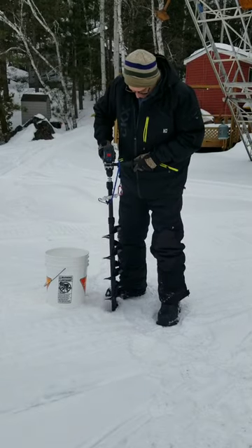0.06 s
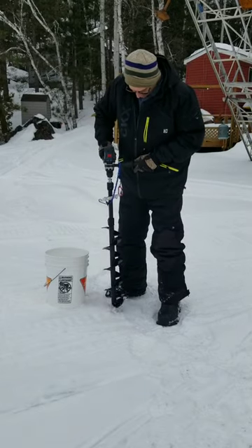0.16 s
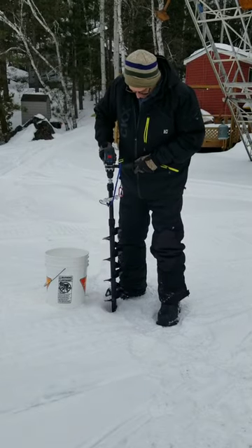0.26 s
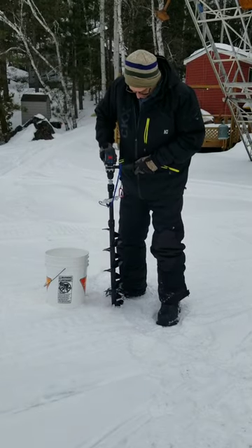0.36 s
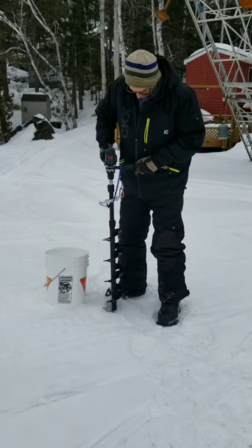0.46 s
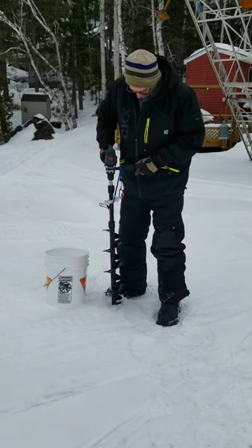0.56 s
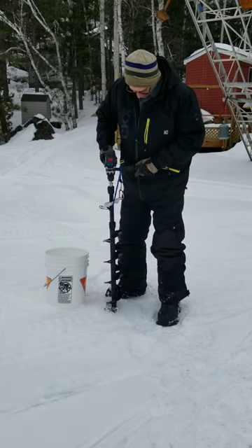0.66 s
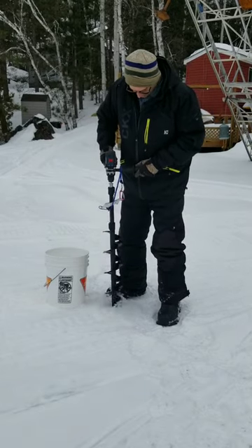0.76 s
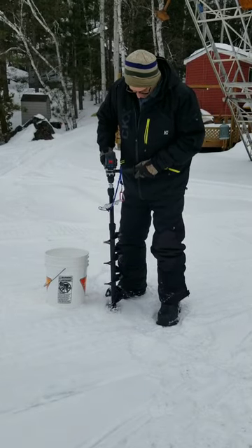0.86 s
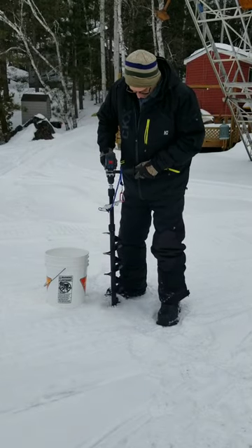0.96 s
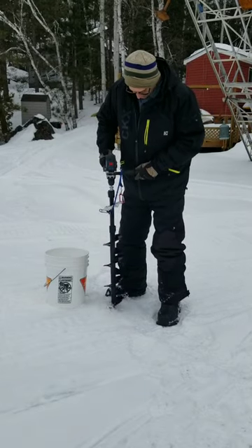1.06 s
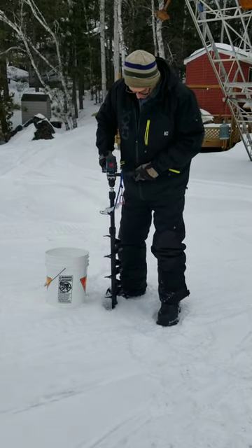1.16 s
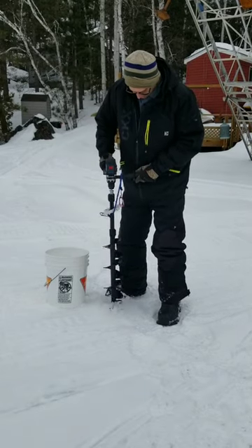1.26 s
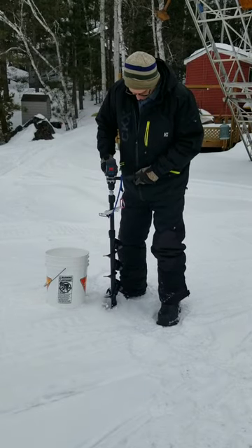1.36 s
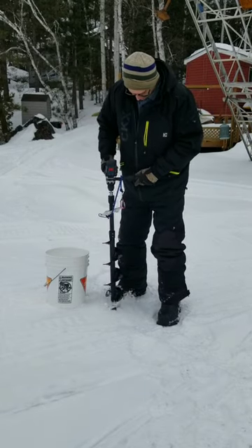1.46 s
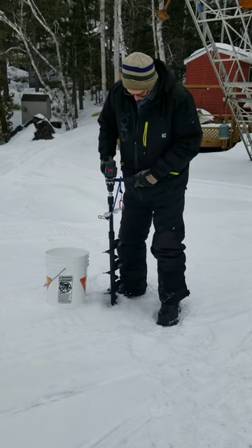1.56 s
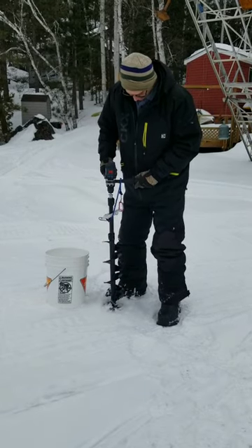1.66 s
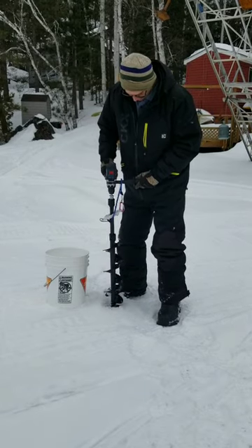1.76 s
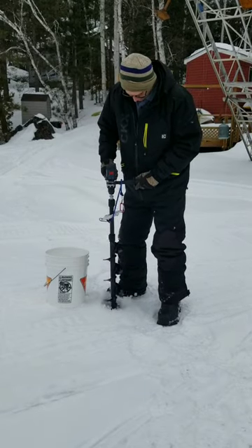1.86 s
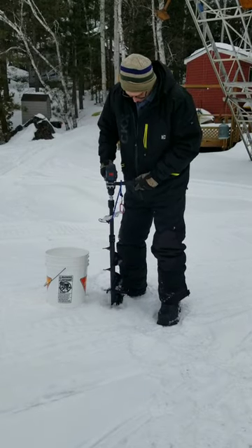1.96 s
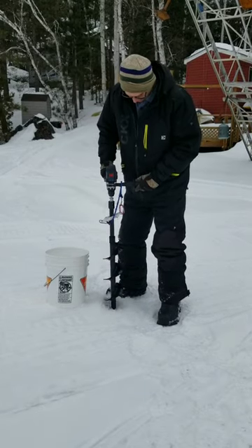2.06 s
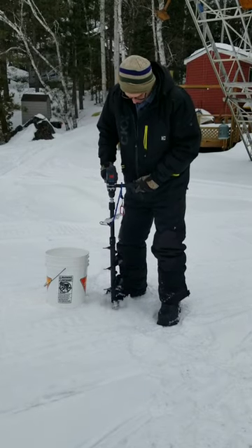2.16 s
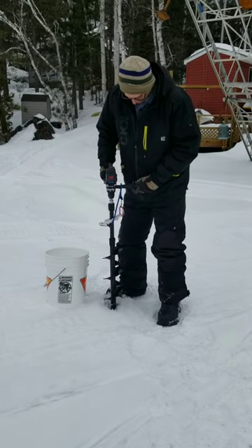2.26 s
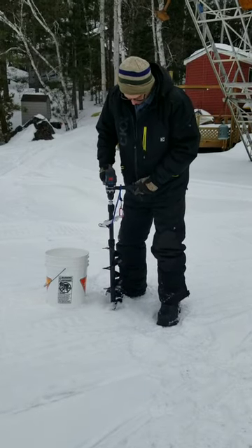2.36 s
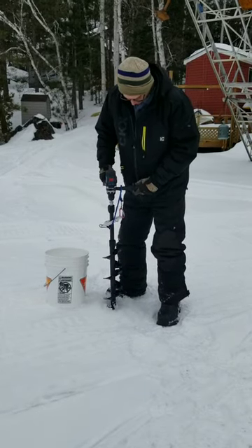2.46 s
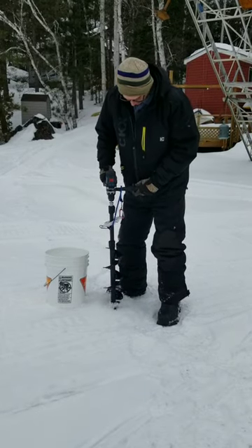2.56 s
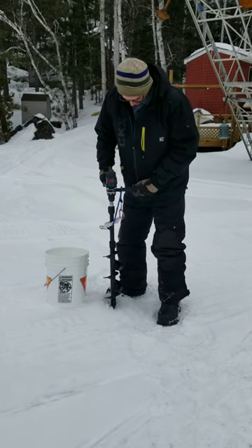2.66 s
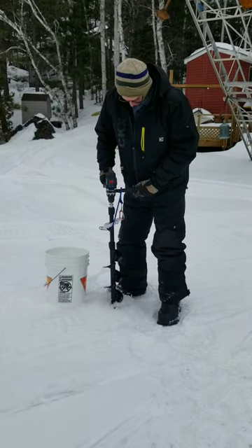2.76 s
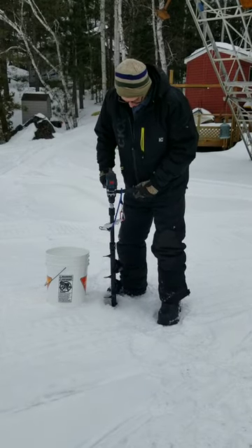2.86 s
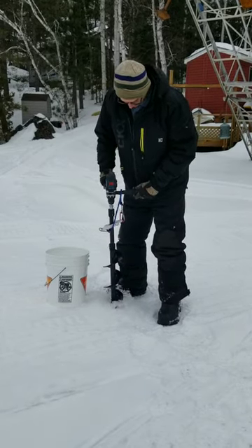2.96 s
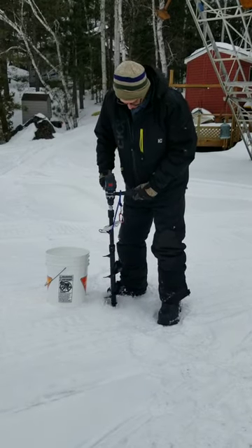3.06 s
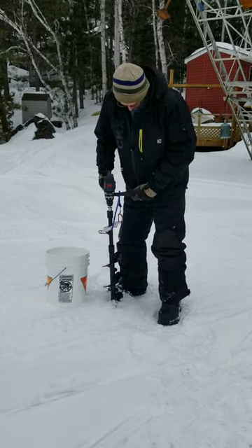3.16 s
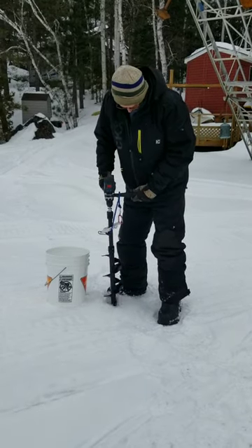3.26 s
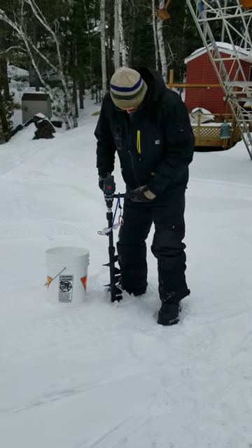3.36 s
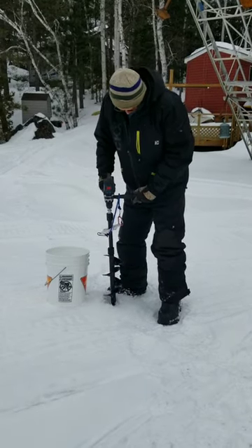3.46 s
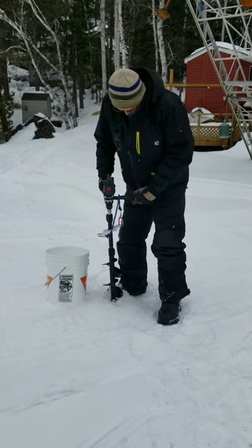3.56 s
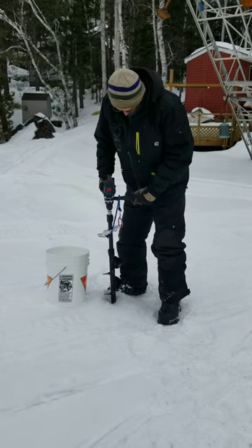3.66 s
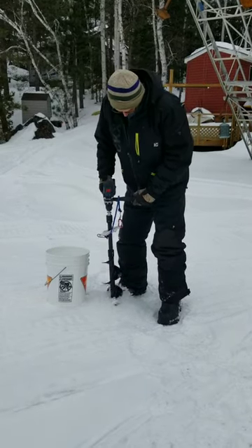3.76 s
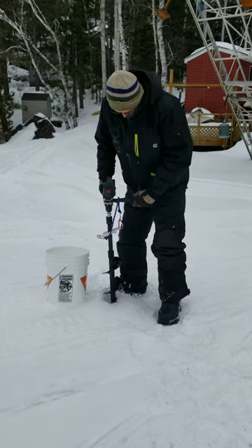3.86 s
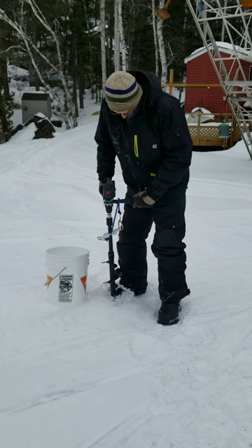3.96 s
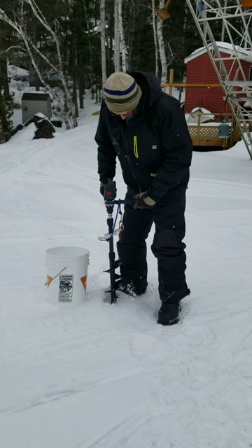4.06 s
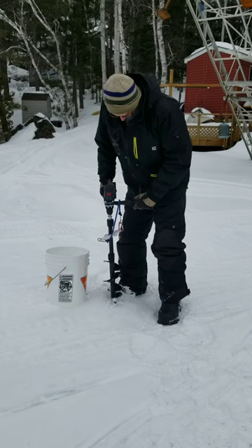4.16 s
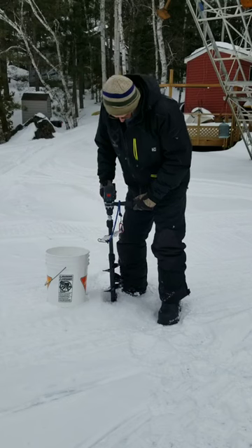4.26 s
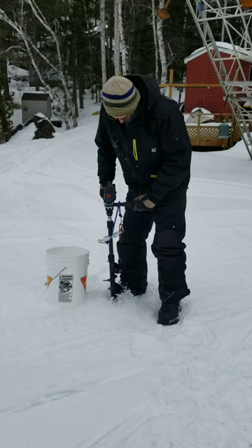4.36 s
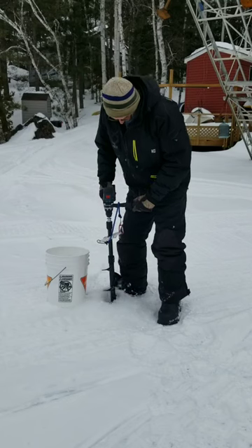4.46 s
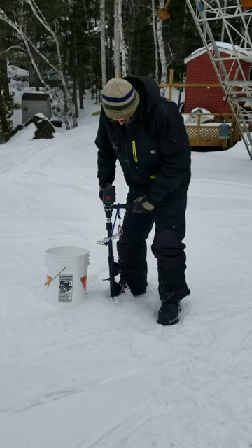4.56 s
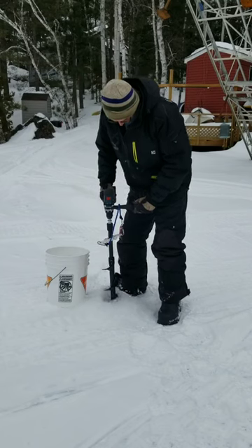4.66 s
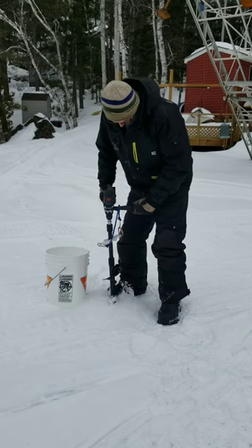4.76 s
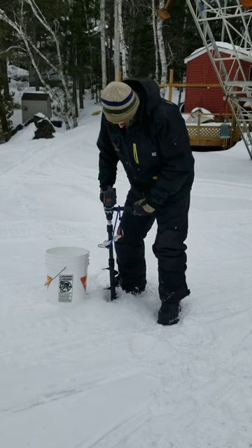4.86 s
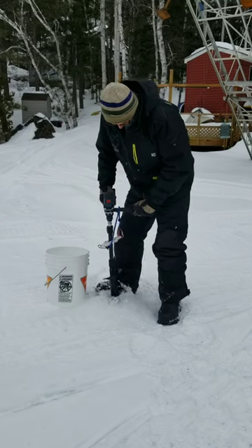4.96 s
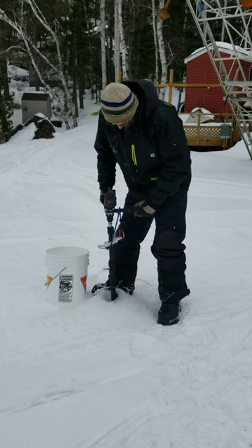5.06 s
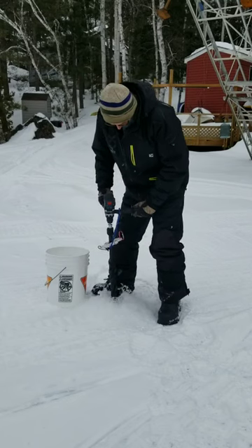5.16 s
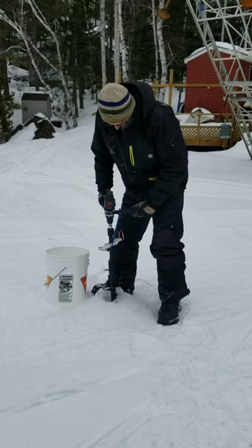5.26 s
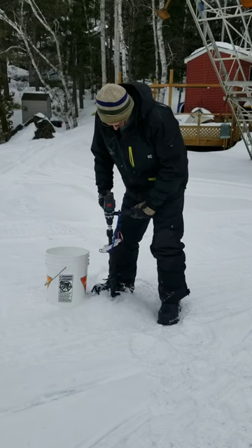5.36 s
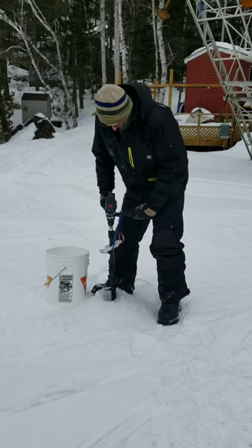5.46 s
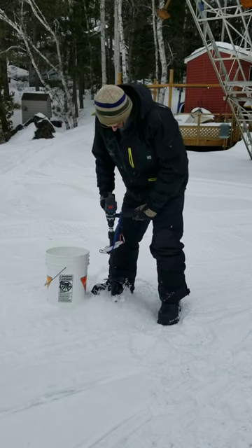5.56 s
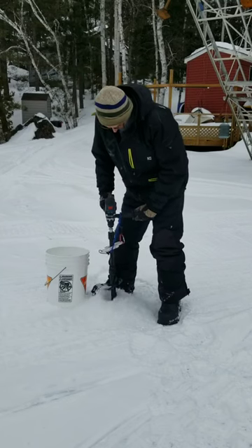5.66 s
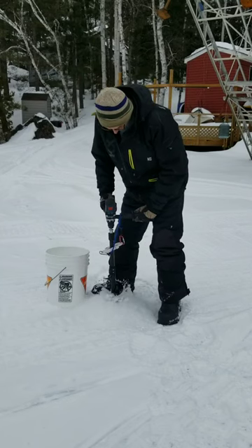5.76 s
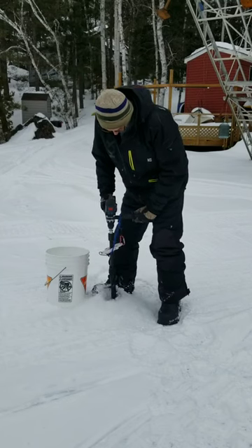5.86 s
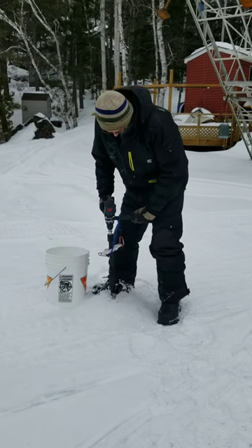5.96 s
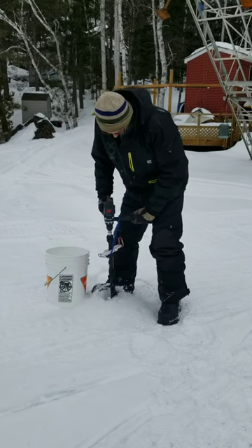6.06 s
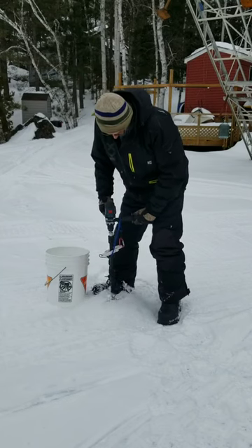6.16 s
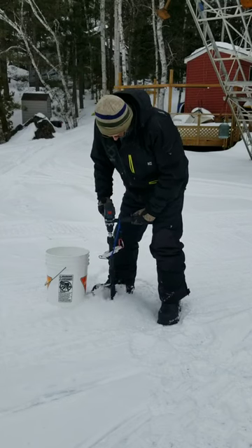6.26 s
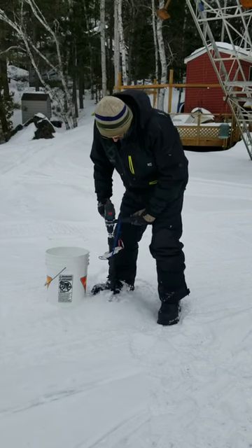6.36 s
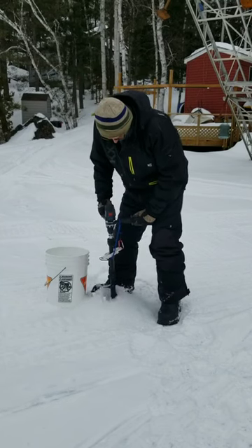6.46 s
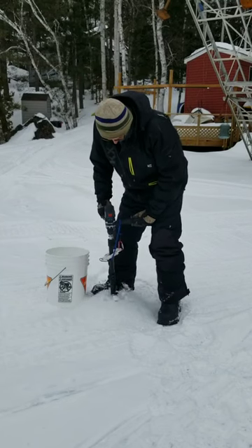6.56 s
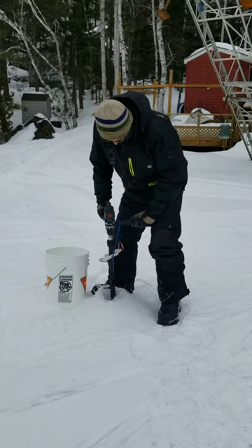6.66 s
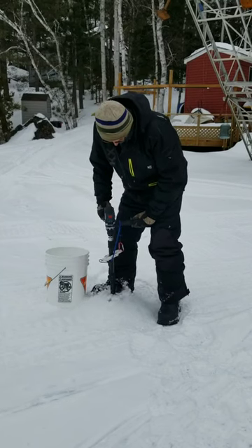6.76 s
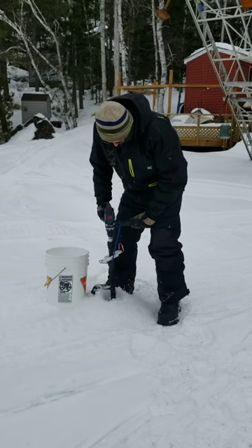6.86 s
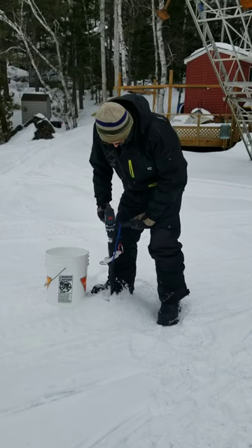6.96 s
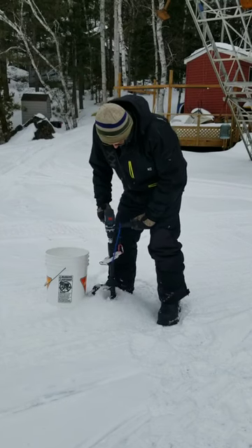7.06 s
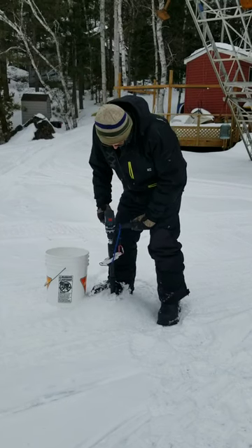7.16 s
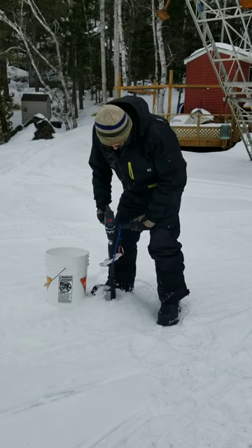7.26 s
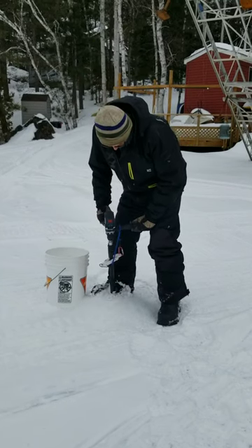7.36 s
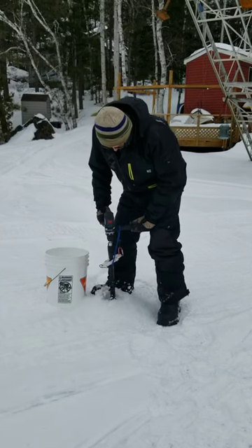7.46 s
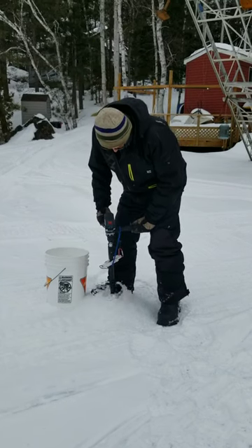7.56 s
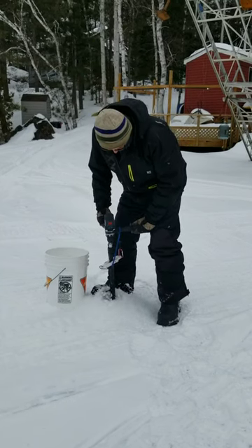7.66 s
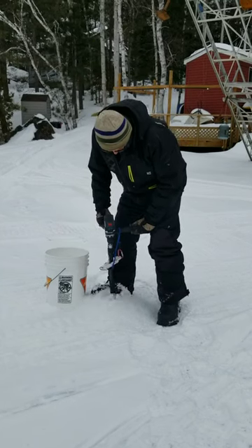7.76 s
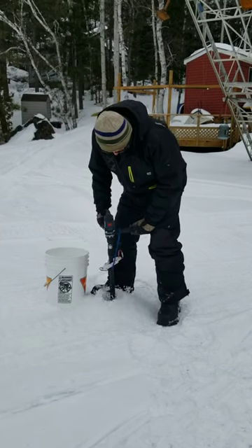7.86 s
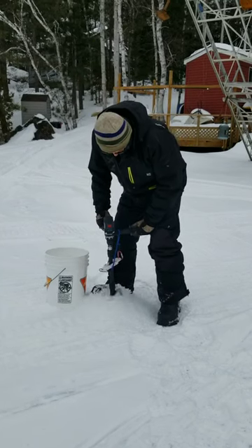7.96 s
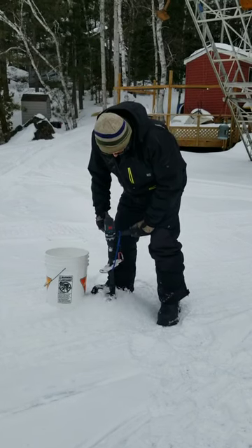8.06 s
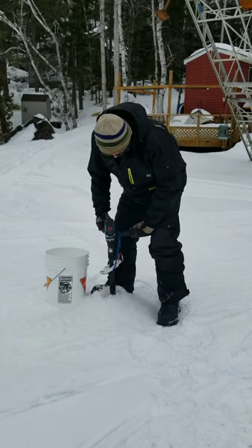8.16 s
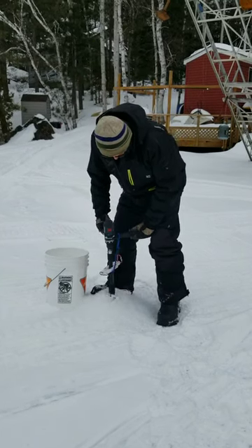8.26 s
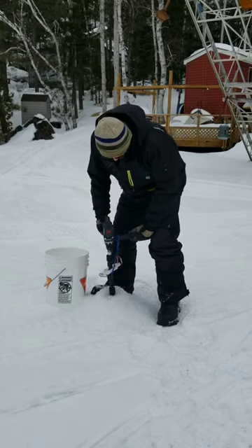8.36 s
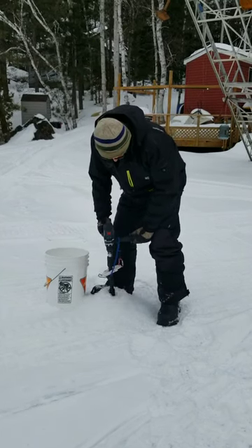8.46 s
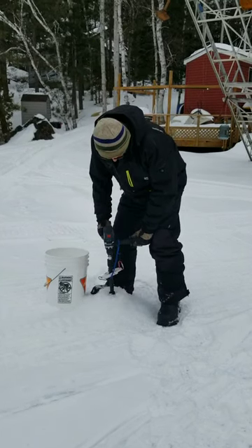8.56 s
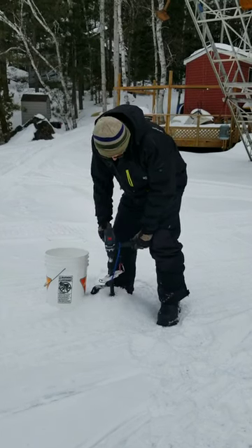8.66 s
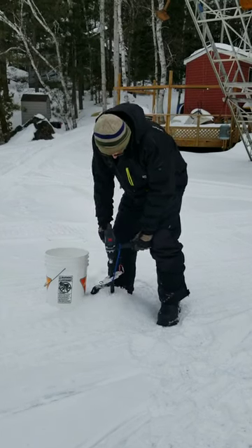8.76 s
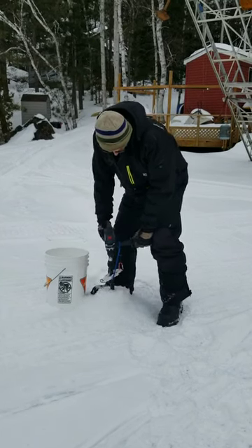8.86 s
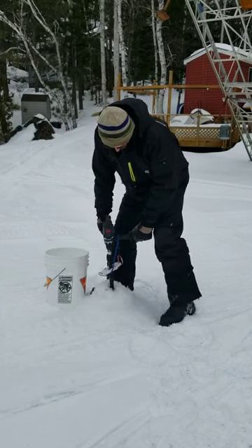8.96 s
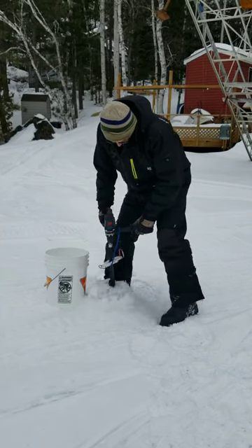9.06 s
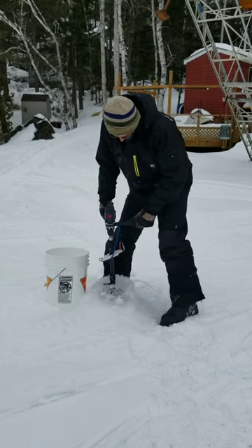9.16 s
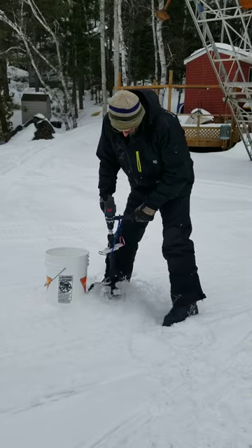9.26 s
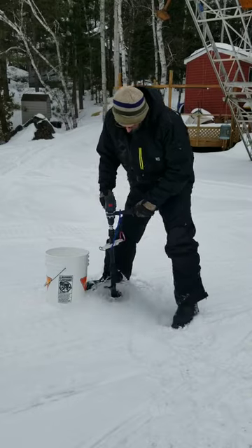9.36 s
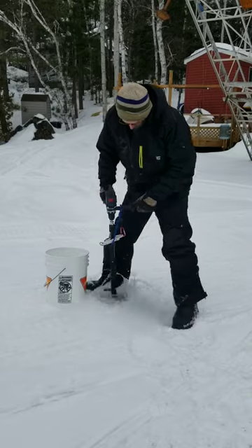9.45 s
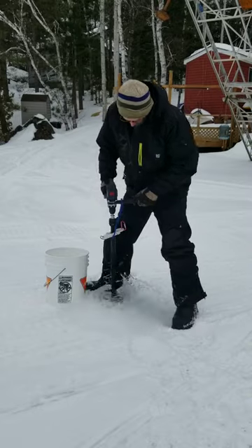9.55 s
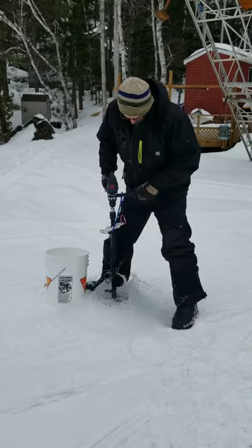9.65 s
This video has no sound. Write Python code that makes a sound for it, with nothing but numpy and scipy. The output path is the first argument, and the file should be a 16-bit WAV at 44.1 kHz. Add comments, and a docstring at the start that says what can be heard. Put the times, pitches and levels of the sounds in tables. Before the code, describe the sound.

Electric motor whine and bright icy scraping deepen into a rough, chattering grind with hard catches, then the load lets go amid low gusty wind thumps.

```python
"""On a frozen lake, a cordless drill drives an auger down through the ice, heard at two microphone ports.
The motor's whine is a set of sines locked to the rotor's turns; its speed sags, stumbles and races, and its fan
adds hiss. The blades are shaped noises: bright shaving, then grinding with a surge twice a turn, chatter, catches,
loose chips and damped knocks. A bending mode of the shaft hums at first. Gusts are low patchy noise and short pushes.
"""
import sys
import numpy as np
from scipy import signal
from scipy.fft import rfft, irfft, next_fast_len
from scipy.io import wavfile
from scipy.ndimage import uniform_filter1d, map_coordinates

SR = 44100
rng = np.random.default_rng(int(sys.argv[2]) if len(sys.argv) > 2 else 0)


def transcribe(u):
    """Save the signal u as a 16-bit wav file named by the first command-line argument.

    u: samples, shape (n,) or (channels, n), limited to [-1, 1]; the rate is SR.
    q: integer samples, one column per channel.
    """
    v = np.clip(np.atleast_2d(u).T, -1, 1)
    q = np.round(v * 32767).astype(np.int16)
    wavfile.write(sys.argv[1], SR, q)


N = 428652

BARS = 14  # commutator bars
GEAR = 53.3  # rotor turns to one turn of the auger

# All levels are relative; the mixing stages add gains of their own.
# The cut. Each row: time in seconds, level in dB of the bright shaving, level in dB of the chips on the flights.
CUTTING = [(0.0, -29.5, -43), (1.05, -32, -40), (1.25, -37, -37.5), (1.36, -44.5, -45), (1.62, -34, -38.5),
           (7.69, -39.5, -47), (8.15, -42, -40), (8.26, -44, -47), (8.55, -46.5, -46), (8.83, -45.5, -49),
           (9.15, -46, -44.5), (9.39, -54, -40.5), (9.72, -42.5, -51)]
# The blades catch hard. Each row: start in seconds, level in dB, length in seconds.
CATCHES = [(5.161, -7.5, 0.033), (5.549, -15, 0.048), (7.693, -10, 0.01)]
# The auger knocks on the wall of the hole. Each row: start in seconds, level in dB, frequency in Hz.
WALL_KNOCKS = [(1.161, -32, 427), (1.271, -28, 573), (3.037, -29.5, 516), (3.995, -28, 405),
               (4.02, -40, 550), (4.77, -26.5, 388), (5.169, -22, 494), (5.382, -32.5, 390),
               (5.561, -30.5, 430), (5.725, -28.5, 400), (5.748, -33, 523), (6.098, -32, 550),
               (6.202, -32.5, 574), (8.107, -29, 540), (9.298, -29, 324), (9.546, -33, 534),
               (9.621, -29.5, 970), (9.696, -33.5, 970)]
# Single pushes of air. Each row: start in seconds, level in dB, frequency in Hz, level in dB of the fluttering top,
# angle in degrees whose cosine weights the left port and whose sine weights the right;
# negative angles put them in opposition.
AIR_PUSHES = [(0.142, -23, 126, -48, 89), (0.589, -18, 77, -37, 50), (0.678, -28, 108, -38, 59),
              (0.737, -24, 170, -39, 60), (1.119, -24, 88, -35, 46), (1.169, -27, 89, -42, 38),
              (1.306, -22, 81, -36, 57), (1.344, -16, 62, -30.5, -58), (1.517, -25, 106, -28, 57),
              (1.65, -27, 104, -36, 88), (1.777, -26, 99, -23, 43), (1.823, -20, 164, -24.5, -17),
              (1.898, -26, 73, -25, 21), (2.002, -26, 145, -37, 5), (2.199, -13, 174, -17, 35),
              (2.25, -27, 75, -31, 34), (2.285, -28, 90, -38, 47), (2.369, -29, 75, -30, 24),
              (2.616, -28, 70, -27, 34), (2.679, -29, 75, -39, 35), (2.858, -25, 109, -33, -21),
              (3.115, -21, 107, -33, 47), (3.138, -21, 131, -37, -23), (3.354, -23.5, 100, -35, 53),
              (3.426, -21, 80.5, -31, 30), (3.779, -28, 90, -43, 37), (4.15, -36, 75, -60, 43),
              (4.694, -29, 65, -53, 37), (5.557, -29, 83, -47, 46), (5.581, -30, 85, -51, 47),
              (6.33, -29, 65, -40, 24), (7.163, -25.5, 80, -54, 30), (7.342, -21, 80, -49, -74),
              (7.404, -20.5, 80, -56, 35), (7.538, -22, 100, -52, 55), (7.759, -21, 76.5, -56, 39),
              (7.919, -14.5, 118, -50, 42), (8.046, -16.5, 70.5, -39, 16), (8.321, -33, 86, -40, 48),
              (9.128, -17, 134, -31, -41), (9.183, -20, 150, -39, -59), (9.257, -20, 160, -28, -37),
              (9.338, -17, 91, -29, 32), (9.354, -14, 111, -34, -20)]


def motor():
    """Commutation: brushes crossing the bars give tones at multiples of the rotor's turns; the fan hisses."""
    # Each row: time in seconds, levels in dB of the commutator tone, its second multiple,
    # the order just above that, and the third multiple.
    whine_levels = [(0, -44, -43, -48, -66), (.85, -54, -55, -65, -68), (1.3, -56, -70, -66, -66),
                    (1.5, -69, -72, -70, -66), (1.69, -53.5, -68, -68, -68), (2.5, -45.5, -66, -59, -60),
                    (3.3, -46.5, -65, -66, -68), (3.55, -51, -62, -56, -66), (3.9, -52.5, -46, -55, -70),
                    (4.3, -46, -52, -56, -57), (5.25, -42, -60, -53, -54), (5.5, -47, -70, -68, -55),
                    (5.65, -49, -62, -65, -57), (5.9, -52, -49, -55, -60), (6.15, -45, -60, -60, -55),
                    (6.19, -55, -60, -62, -62), (6.3, -52, -56, -58, -48), (6.38, -41, -36, -48, -51),
                    (7.35, -45, -40, -53, -49), (7.45, -49, -37.5, -48, -49), (7.97, -51, -38, -52, -51),
                    (8.22, -51, -41, -50, -58), (8.32, -54, -68, -70, -66), (8.4, -70, -50, -70, -54),
                    (8.9, -65, -50, -66, -45), (9.72, -66, -68, -68, -65)]
    # Rotor orders around the second multiple. Each row: order, level in dB, phase blur in cycles.
    second_orders = [(28.2, -7, 0.23), (24.8, -22, 0.074), (25, -14, 0.078)]
    # Rotor orders around the third multiple. Each row: order, level in dB, phase blur in cycles.
    third_orders = [(42, 0, .2), (43, -1.5, .2), (44, -7, .2)]
    tone_db, second_db, above_db, third_db = curves(whine_levels)
    turns = rotor()

    def tone(order, blur, rate=220):
        """Phase modulation: random blur broadens the line of one rotor order."""
        level = np.sqrt(2) * amp(1.3 * wobble(25))
        return level * np.sin(2 * np.pi * (order * turns + blur * wobble(rate)))

    whine = amp(tone_db) * tone(BARS, 0.14, rate=70)
    whine += amp(above_db) * tone(2 * BARS + 1, 0.31)
    whine += amp(second_db) * sum(amp(db) * tone(order, blur) for order, db, blur in second_orders)
    whine += amp(third_db) * sum(amp(db) * tone(order, blur) for order, db, blur in third_orders)
    return fan_hiss() + whine * [[1], [0]]  # the whine goes into the signal that reaches both ports


def fan_hiss():
    """Broadband flow noise: cooling air and brushes hiss with a slightly wavering level."""
    # Each row: time in seconds, level in dB.
    hiss_levels = [(0.0, -34), (1.38, -39), (1.65, -36.5), (2.03, -41.5), (5.06, -35), (5.98, -39.5),
                   (8.23, -37), (8.93, -36.5), (9.18, -38), (9.72, -39)]
    # Each row: frequency in Hz, relative spectral density in dB per Hz.
    hiss_spectrum = [(530, -51), (900, -15), (1290, 0), (3290, -8), (3580, -6.5), (3990, -3.5), (5520, -6),
                     (7550, -3.5), (8510, -12), (11900, -6.5), (13000, -9), (15000, -0.5), (15900, -1.5)]
    level = amp(curves(hiss_levels)[0] + 0.6 * wobble(10))
    return level * rush(hiss_spectrum, patchy_db=3.0, grain_db=1.1, blotch_db=2)


def rotor():
    """Phase is the integral of frequency: turns of the rotor so far, with a ripple that follows the surge."""
    ripple_hz_per_db, ripple_lead, waver_hz = 1.5, .1, 8  # the lead is in cycles of the surge
    pitch = speed() + ripple_hz_per_db * surge(ripple_lead) + waver_hz * wobble(14)
    return np.cumsum(pitch) / SR / BARS


def speed():
    """Speed falls under torque: pitch of the commutator tone in Hz, with brief stumbles where the blades hang."""
    # Base pitch of the commutator tone. Each row: time in seconds, frequency in Hz.
    base_pitch = [(0, 3680), (.15, 3680), (.35, 3760), (1.12, 3760), (1.37, 4500), (1.49, 4626),
                  (1.7, 4339), (2.04, 4270), (2.29, 4156), (2.5, 4112), (3.3, 4148), (3.9, 4225),
                  (4.55, 4185), (5.08, 4015), (5.2, 3894), (5.38, 4075), (5.655, 4235), (5.7, 4345),
                  (5.92, 4233), (6.14, 4102), (6.4, 3871), (7.15, 3847), (7.34, 3950), (7.4, 3870),
                  (7.65, 3830), (7.83, 3860), (7.91, 3940), (8.08, 3753), (8.22, 3839), (8.33, 4480),
                  (8.4, 4850), (8.55, 5090), (8.75, 5000), (9.72, 5000)]
    # Each row: centre in seconds, drop of the commutator tone in Hz, half width in seconds at 1/e of the drop.
    stumble_rows = [(2.02, 67, 0.068), (2.455, 59, 0.06), (2.693, 80, 0.08), (2.869, 90, 0.048),
                    (3.08, 136, 0.046), (3.181, 89, 0.021), (3.643, 83, 0.031), (4.293, 118, 0.045),
                    (4.43, 86, 0.058), (4.626, 80, 0.036), (5.48, 94, 0.039), (5.572, 270, 0.022),
                    (5.641, 290, 0.028), (5.76, 129, 0.08), (6.79, 51, 0.03), (6.882, 50, 0.018),
                    (6.995, 47, 0.026), (8.04, 92, 0.027)]
    t = np.arange(N) / SR
    drop = sum(hz * np.exp(-((t - s) / width) ** 2) for s, hz, width in stumble_rows)
    return curves(base_pitch)[0] - drop


def surge(lead):
    """Periodic loading: the load in dB swings twice a turn with the two blades."""
    # Each row: time in seconds, size of the swing in dB.
    surge_sizes = [(0, 1.5), (2, 1), (4, 1.8), (6.6, 1.2), (7.4, 3), (8.15, 3), (8.3, 0)]
    blade_angle = -.43  # in cycles of the surge
    auger_turns = np.cumsum(speed()) / SR / BARS / GEAR
    return curves(surge_sizes)[0] * np.cos(2 * np.pi * (2 * auger_turns + blade_angle + lead))


def blades():
    """Fracture noise: ice breaks under the edges, and the surging load also shakes shavings and chips."""
    return grinding() + shaving() + loose_chips() + wall_knocks()


def catches():
    """Stick and release: amplitude of the swells where the blades catch hard."""
    return swells([(s, amp(db - 15.5), length) for s, db, length in CATCHES])


def grinding():
    """Forced vibration: the loaded blades give a broad rasp and make the shaft ring, with chatter and catches."""
    # The blades grinding in the hole. Each row: time in seconds, level in dB.
    load_levels = [(0, -48.5), (1.15, -36.5), (1.4, -44.5), (1.75, -43.5), (2.4, -38.5), (3.2, -34.5),
                   (4.2, -35), (4.9, -31.5), (5.3, -30), (5.67, -37), (6.2, -36), (6.7, -32.5),
                   (7.4, -32.5), (8.12, -31), (8.235, -39.5), (8.27, -41), (8.5, -50), (9.1, -50.5),
                   (9.3, -41.5), (9.72, -44)]
    # The shaft chatters as an edge skips over the ice. Each row: start in seconds, level in dB.
    chatter_rows = [(.235, -34), (.418, -36), (.63, -41), (.815, -34), (.985, -45), (2.04, -39),
                    (2.43, -41), (3.195, -38), (3.585, -37), (3.8, -32), (4.0, -35), (4.165, -37),
                    (4.355, -44), (4.52, -34), (4.7, -38), (4.895, -35), (5.03, -41), (5.268, -37),
                    (5.405, -36), (5.73, -31), (5.8, -35), (5.94, -36), (6.135, -38), (6.335, -30),
                    (6.49, -37), (6.55, -39), (6.685, -33), (6.91, -37), (7.28, -45), (7.475, -40),
                    (7.525, -39), (7.86, -35), (7.975, -45), (8.085, -46), (8.175, -40)]
    # The ring keeps a steady level under the load. Each row: time in seconds, level in dB over the load.
    ring_levels = [(2, -6.5), (4.5, -6.5)]
    # The broad rasp. Each row: frequency in Hz, relative spectral density in dB per Hz.
    rasp_spectrum = [(500, -25), (850, -17), (989, -5), (1100, -14), (1330, -9), (1480, -4.5), (1580, -10),
                     (1770, -3.5), (2050, -4), (2270, -4), (2500, -7), (3600, -16.5), (4680, -58),
                     (7920, -120)]
    # The shaft ringing under load. Each row: frequency in Hz, relative spectral density in dB per Hz.
    ring_spectrum = [(1200, -120), (1560, -14), (1700, -1), (1795, 2), (1890, -2), (2100, -27),
                     (2800, -120)]
    surge_db, catch = surge(lead=0), catches()
    load_db = curves(load_levels)[0]
    chatter = swells([(s, amp(db), 0.042) for s, db in chatter_rows])
    # the rasp follows only a share of the surge and the chatter
    rasp = amp(load_db - 2.5 + 0.35 * surge_db + 0.15 * wobble(16)) + 0.65 * catch + 0.2 * chatter
    ring = amp(load_db + curves(ring_levels)[0] + surge_db + 2.5 * wobble(20)) + 0.83 * catch + chatter
    rasp_noise = rush(rasp_spectrum, patchy_db=2.2, grain_db=1.65)
    ring_noise = rush(ring_spectrum, patchy_db=0.5, grain_db=-0.5)
    return rasp * rasp_noise + ring * ring_noise


def shaving():
    """Brittle fracture: the many small breaks under the edges are heard as bright noise."""
    # Each row: frequency in Hz, relative spectral density in dB per Hz.
    shave_spectrum = [(760, -26), (1150, -36), (1300, -9), (1480, -6), (1750, -1.5), (2150, -0.5),
                      (2480, -1), (2800, 2.5), (3050, 0), (3300, -5), (3570, -3), (3850, -8.5),
                      (4080, -9.5), (5500, -11.5), (5850, -8.5), (6060, -4), (6810, -13), (7610, -6),
                      (8250, -13), (10000, -20), (13000, -16.5), (22000, -120)]
    shave_db, _ = curves(CUTTING)
    level = amp(shave_db + 0.043 * surge(lead=0) + .4 * wobble(18)) + 0.15 * catches()
    return level * rush(shave_spectrum, patchy_db=2.9, grain_db=1.8, blotch_db=1.2)


def loose_chips():
    """Granular noise: chips on the flights give low noise, and each knock shakes more loose."""
    # Each row: frequency in Hz, relative spectral density in dB per Hz.
    chip_spectrum = [(60, -58), (190, -8.5), (270, -6.5), (361, 1.5), (451, -5.5), (590, 3), (740, -1.5),
                     (986, -9.5), (1200, -18.5), (1560, -56), (2640, -120)]
    _, chips_db = curves(CUTTING)
    jolt = swells([(s, amp(db - 10.5), .03) for s, db, _ in WALL_KNOCKS])
    level = amp(chips_db + 0.33 * surge(lead=0) + 0.31 * wobble(8)) + jolt
    return level * rush(chip_spectrum, patchy_db=2.5, grain_db=1.24)


def wall_knocks():
    """Impact response: each knock on the wall of the hole is a damped sine."""
    shares = [np.array([[.8], [.2]])] * len(WALL_KNOCKS)
    return thuds(WALL_KNOCKS, shares, life=2.84, scatter=0.29)


def shaft():
    """Resonance: the unbalanced rotor keeps one bending mode humming, roughened by the cut, until the hole grips."""
    # The free shaft's hum. Each row: time in seconds, level in dB.
    hum_levels = [(0.0, -45.5), (1.35, -40), (1.45, -82)]
    mode_hz, width_hz = 363, 30

    def mode(f):
        """Second-order resonance: gain peaks at the mode's frequency."""
        return 1j * f * width_hz / (mode_hz ** 2 - f * f + 1j * f * width_hz)

    cycles = mode_hz * np.arange(N) / SR + .15 * wobble(25)
    steady = amp(4 * wobble(20)) * np.sin(2 * np.pi * cycles)
    rough = unit(filtered(rng.standard_normal(N), mode))
    return amp(curves(hum_levels)[0]) * unit(steady + .45 * rough) * [[1], [0]]


def wind():
    """Turbulent pressure at the ports: lumpy noise, different at each, and single quick pushes."""
    lean_db = [[.6], [-.6]]  # left port slightly louder
    return (turbulence() + air_pushes()) * amp(lean_db)


def turbulence():
    """Turbulence: random low buffeting with a higher flutter; each push leaves rough air behind it."""
    # Each row: time in seconds, level in dB of the buffeting.
    wind_levels = [(0.03, -71), (0.14, -31.5), (0.45, -48), (0.6, -39.5), (1.35, -40), (1.58, -39),
                   (1.72, -34), (2.0, -33.5), (3.45, -39.5), (3.6, -40.5), (4.15, -46), (4.32, -52),
                   (4.7, -43), (5.4, -45.5), (6.35, -41), (6.97, -49), (7.17, -41), (8.1, -32), (8.39, -34),
                   (8.52, -50), (8.85, -48.5), (9.34, -25), (9.42, -28), (9.55, -42), (9.6, -48),
                   (9.69, -56)]
    # Low buffeting. Each row: frequency in Hz, relative spectral density in dB per Hz.
    buffet_spectrum = [(20, -17), (45, -5), (65, -2.5), (110, -5.5), (150, -13), (300, -20), (600, -120)]
    # Higher flutter. Each row: frequency in Hz, relative spectral density in dB per Hz.
    flutter_spectrum = [(70, -45), (130, 3), (300, 1.5), (420, -4), (700, -19.5), (1400, -120)]
    wake = swells([(s, amp(db - 21.5), .045) for s, db, *_ in AIR_PUSHES])
    low = amp(curves(wind_levels)[0]) + wake
    # each port has its own lumps, and both share some
    lumps = amp(1.5 * np.array([wobble(14), wobble(21)]) + 2.4 * wobble(12))
    tops = swells([(s - .005, amp(top_db), .025) for s, _, _, top_db, _ in AIR_PUSHES])
    buffet = low * unit(lumps * rush(buffet_spectrum, patchy_db=-0.5, grain_db=5.5))
    flutter = low * amp(-7) * unit(lumps ** 2) + tops
    return buffet + flutter * rush(flutter_spectrum, patchy_db=1, grain_db=-1.5)


def air_pushes():
    """Pressure transients: each push is a short damped swing, high-passed at 40 Hz."""
    angles = np.radians([row[4] for row in AIR_PUSHES])
    shares = [np.sqrt(2) * np.array([[np.cos(a)], [np.sin(a)]]) for a in angles]
    pushes = thuds([row[:3] for row in AIR_PUSHES], shares, life=.6, scatter=.08)
    return filtered(pushes, lambda hz: 1j * hz / (40 + 1j * hz))


def ports(pair):
    """Partial coherence: both ports get the first signal with a phase step; the second is what they do not share."""
    # Each row: frequency in Hz, likeness from 0 to 1, phase in radians by which the left leads,
    # left over right in dB.
    port_rows = [(300, .9, -.1, 1.5), (860, .93, 0, 2.5), (1200, .65, -1, 2), (1800, .93, -.9, 2),
                 (2900, .75, -1.4, 2), (3600, .56, -.9, 2), (4100, .62, .4, 1.2), (5000, .55, -2, .5),
                 (5650, .3, -3, .5), (6050, .48, -.3, .5), (6800, .1, 0, .5), (7750, .75, 0, .2),
                 (10000, .6, 0, 0), (16000, .66, 0, .8)]
    at, *columns = np.transpose(port_rows)
    hz = np.fft.rfftfreq(next_fast_len(N + 8192), 1 / SR)
    alike, lead, lean_db = (np.interp(hz, at, c) for c in columns)
    turn = np.arccos(alike) / 2
    same, apart = filtered(pair, lambda _: np.array([np.cos(turn), np.sin(turn)]))
    half = amp(lean_db / 2) * np.exp(.5j * lead)  # each port takes half the step
    return filtered(np.array([same + apart, same - apart]), lambda _: 1.156 * np.array([half, 1 / half]))


def thuds(rows, shares, life, scatter):
    """Damped oscillation: (s, dB, Hz) sines whose envelope peaks after life cycles; channel phases scatter in cycles."""
    out, t = np.zeros((2, N + SR)), np.arange(SR // 8) / SR
    for (s, db, hz), share in zip(rows, shares):
        u = hz * t / life
        phase = rng.random() + scatter * rng.standard_normal((2, 1))
        wave = np.sin(2 * np.pi * (hz * t + phase))
        out[:, round(s * SR):][:, :len(t)] += amp(db) * share * u * np.exp(1 - u) * wave
    return out[:, :N]


def swells(rows):
    """Transient envelope: sum of (s, size, length s) swells that rise fast, hold and stop."""
    out = np.zeros(N + SR)
    for s, size, length in rows:
        u = np.arange(int(3 * abs(length) * SR) + 2) / (abs(length) * SR + 1)
        out[round(s * SR):][:len(u)] += size * (1 - np.exp(-8 * u)) * np.exp(-u ** 3)
    return out[:N]


def rush(spectrum, patchy_db, grain_db, blotch_db=0):
    """Modulated noise: two unrelated noises of joint rms 1; narrow bands swell and fade, wide ones flicker."""
    grain = amp(grain_db * wobble(300))
    z = signal.stft(rng.standard_normal((2, N)) * grain, nperseg=512)[2]

    def field(wide, long):
        """Smoothed randomness: a field of rms 1, averaged over wide bins and long frames."""
        across = uniform_filter1d(rng.standard_normal(z.shape[1:]), size=wide, axis=0)
        return unit(uniform_filter1d(across, size=long, axis=1))

    gain = amp(patchy_db * field(2, 12) + blotch_db * field(14, 7))
    pair = signal.istft(z * gain, nperseg=512)[1][:, :N]
    return unit(filtered(pair, lambda hz: amp(along(spectrum, hz))))


def filtered(x, response):
    """Convolution theorem: x times a complex response of frequency, zero-padded."""
    m = next_fast_len(N + 8192)
    return irfft(rfft(x, m) * response(np.fft.rfftfreq(m, 1 / SR)), m)[..., :N]


def wobble(rate):
    """Band-limited randomness: a smooth random curve, rate knots a second."""
    knots = rng.standard_normal(int(N * rate / SR) + 4)
    return map_coordinates(knots, [np.arange(N) * rate / SR])


def curves(rows):
    """Linear interpolation: one value per sample for each column after the time."""
    s, *cols = np.transpose(rows)
    return [np.interp(np.arange(N) / SR, s, c) for c in cols]


def along(points, hz):
    """Logarithmic frequency scale: (Hz, value) points interpolated on a log axis."""
    f, v = np.transpose(points)
    return np.interp(np.log(hz + 1), np.log(f + 1), v)


def amp(db):
    """Decibel law: amplitude ratio of a level in dB."""
    return 10 ** (np.asarray(db) / 20)


def unit(x):
    """Normalisation of power: x scaled to rms 1."""
    return x / np.sqrt(np.mean(x ** 2) + 1e-20)


def scene():
    """Superposition: drill, blades and shaft pass to the ports together, and the wind adds at each."""
    return ports(motor() + blades() + shaft()) + wind()


def record(dry):
    """Band limiting: nothing is kept from 15850 Hz up."""
    return filtered(dry, lambda hz: hz < 15850)


dry = scene()
out = record(dry)
transcribe(out)
```